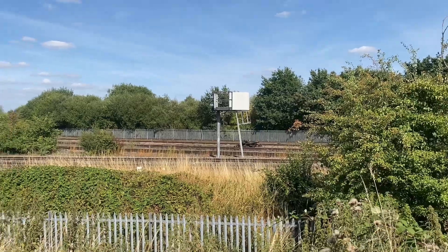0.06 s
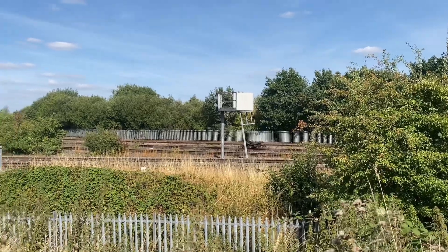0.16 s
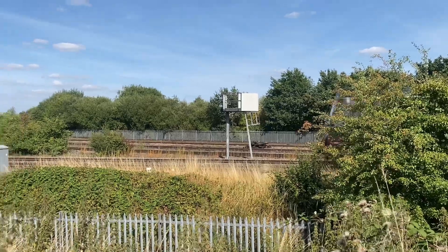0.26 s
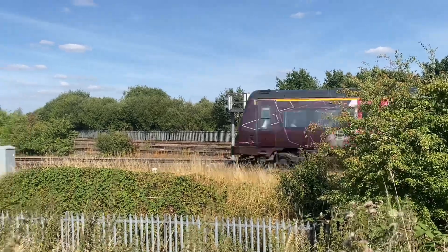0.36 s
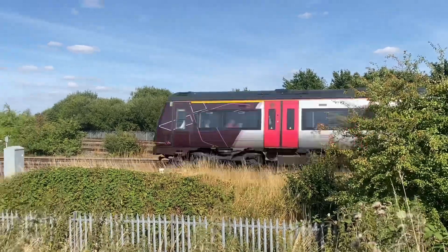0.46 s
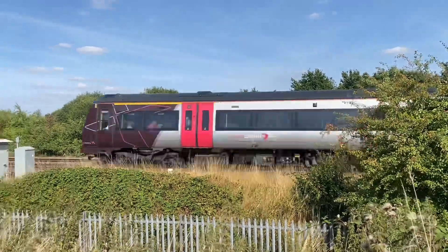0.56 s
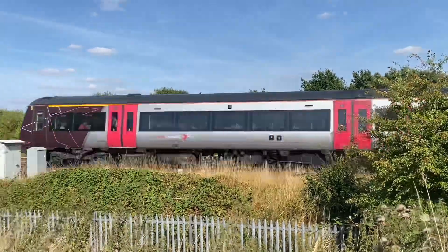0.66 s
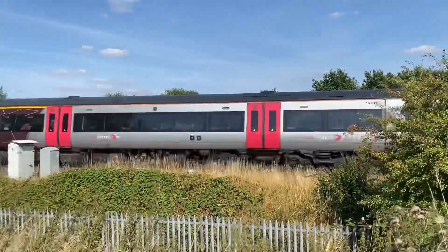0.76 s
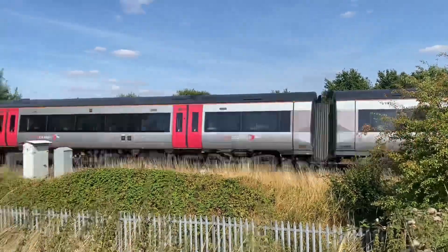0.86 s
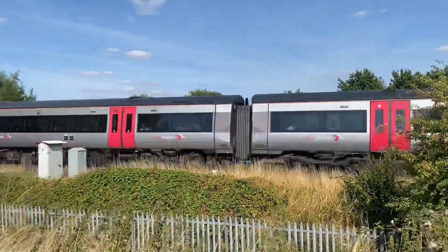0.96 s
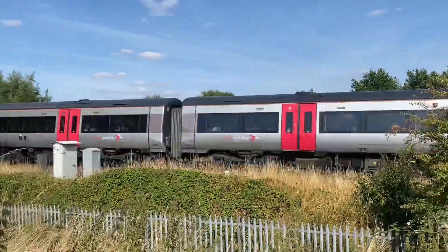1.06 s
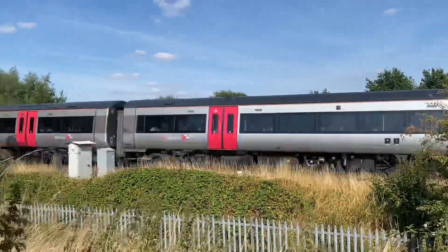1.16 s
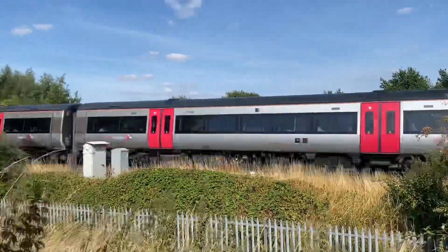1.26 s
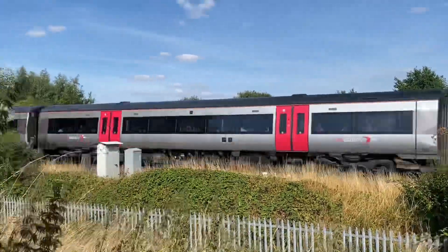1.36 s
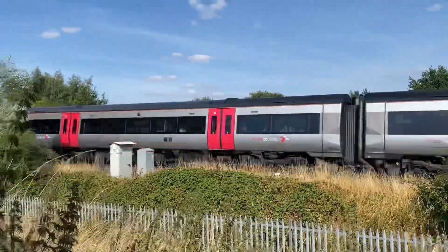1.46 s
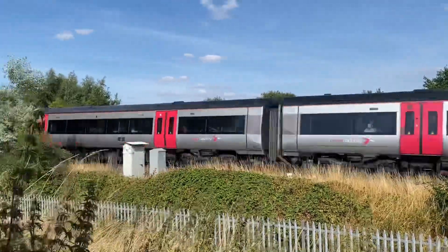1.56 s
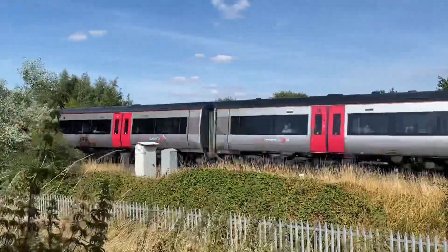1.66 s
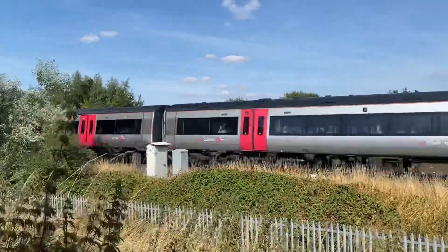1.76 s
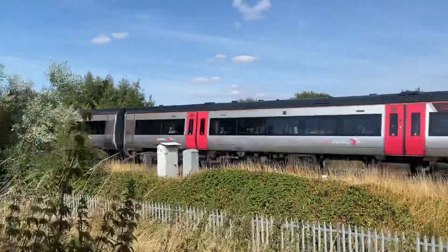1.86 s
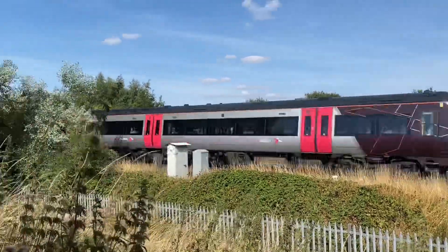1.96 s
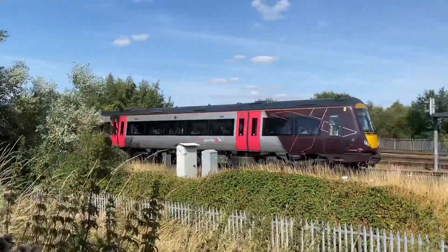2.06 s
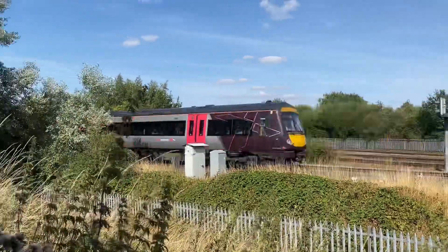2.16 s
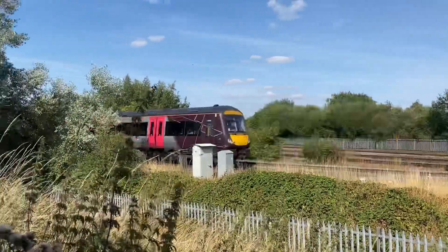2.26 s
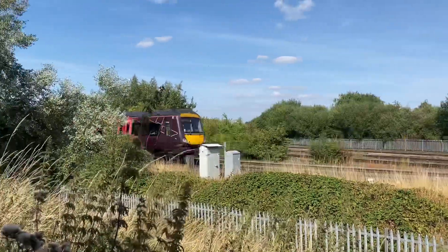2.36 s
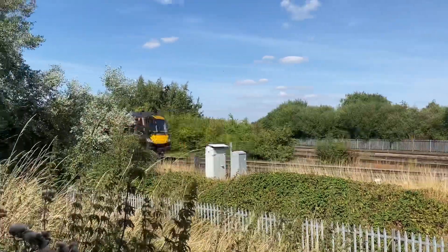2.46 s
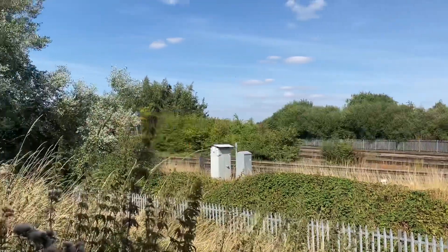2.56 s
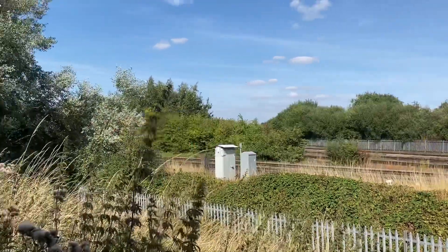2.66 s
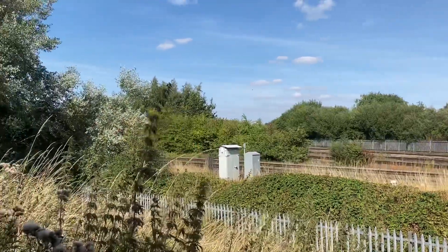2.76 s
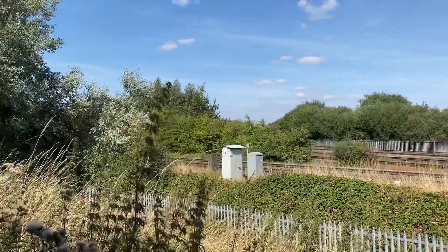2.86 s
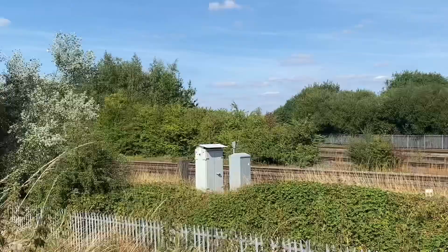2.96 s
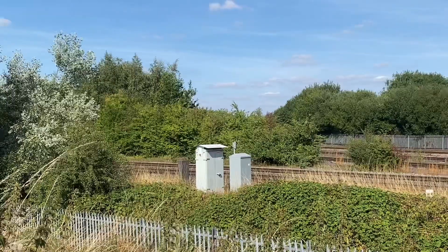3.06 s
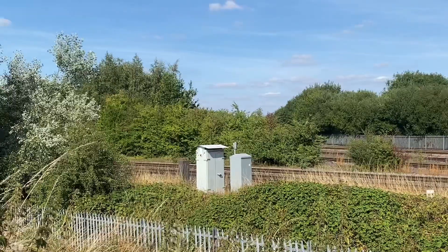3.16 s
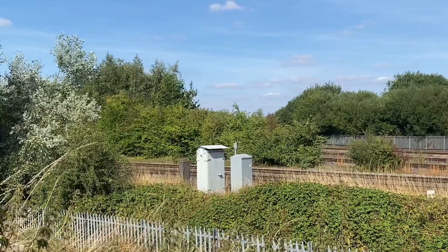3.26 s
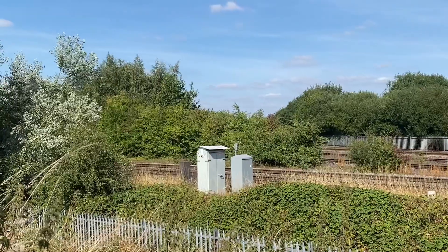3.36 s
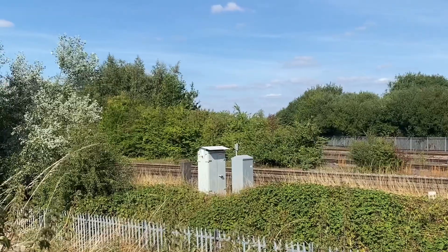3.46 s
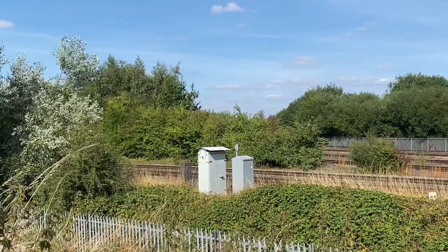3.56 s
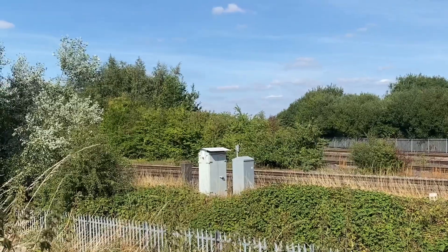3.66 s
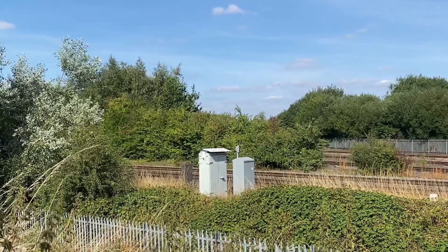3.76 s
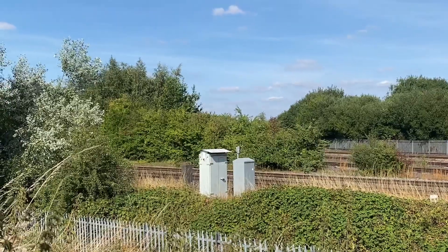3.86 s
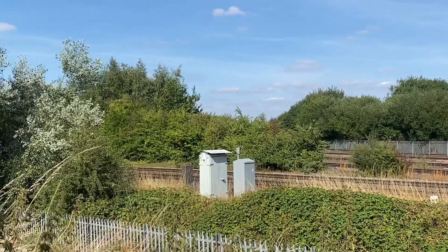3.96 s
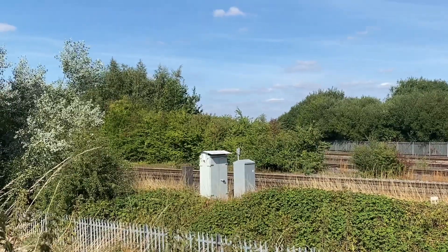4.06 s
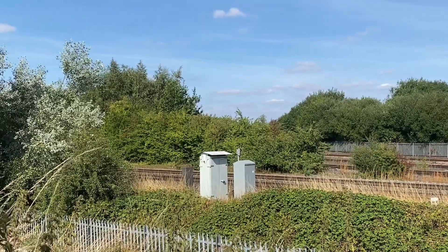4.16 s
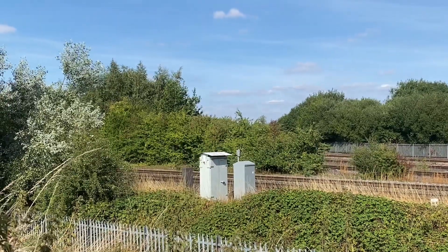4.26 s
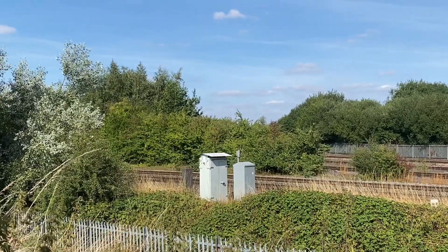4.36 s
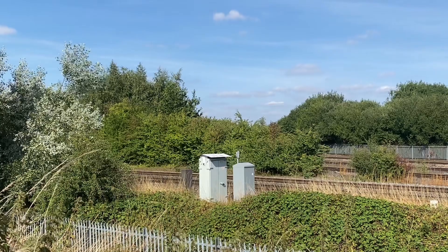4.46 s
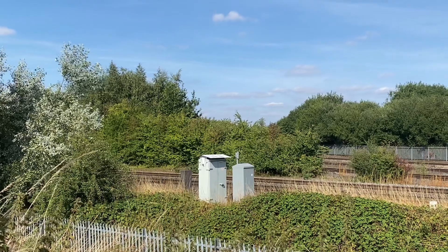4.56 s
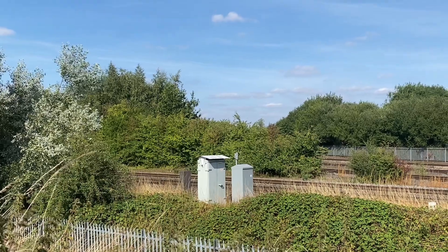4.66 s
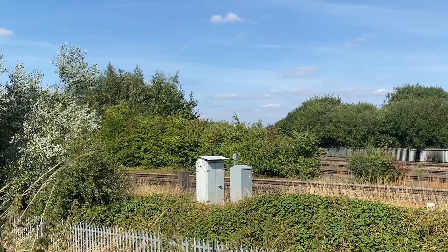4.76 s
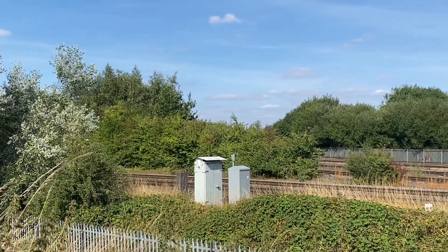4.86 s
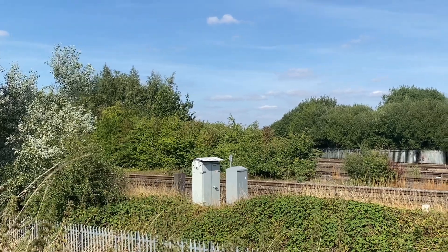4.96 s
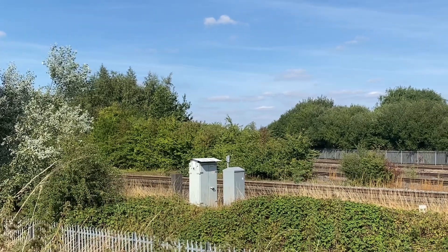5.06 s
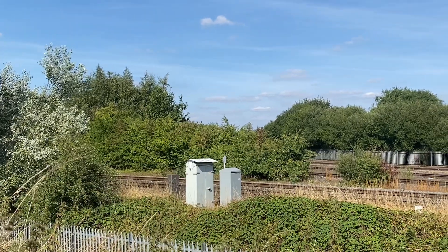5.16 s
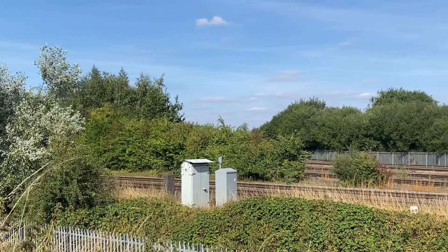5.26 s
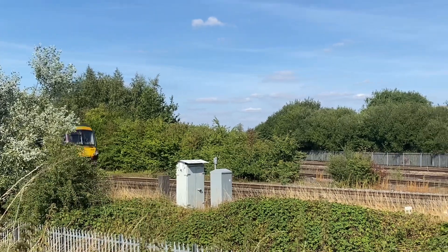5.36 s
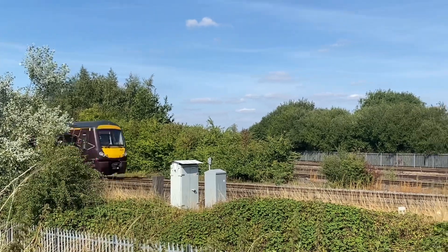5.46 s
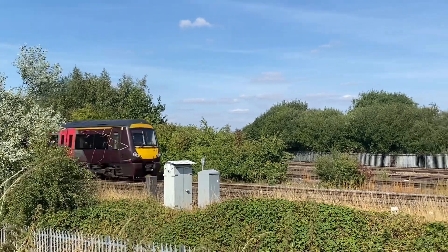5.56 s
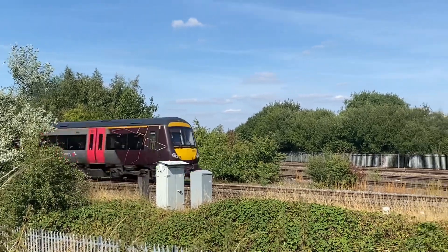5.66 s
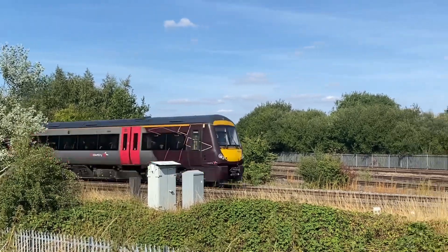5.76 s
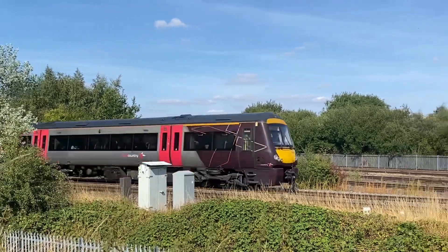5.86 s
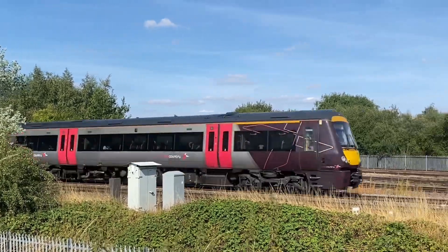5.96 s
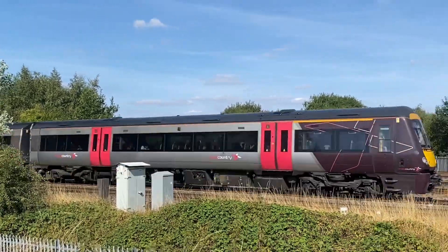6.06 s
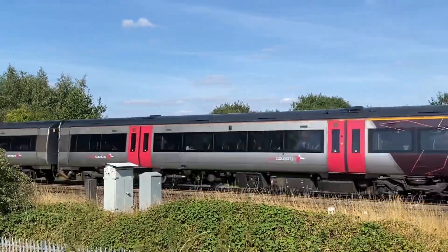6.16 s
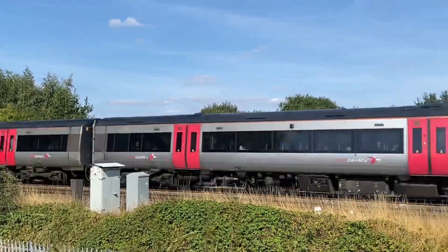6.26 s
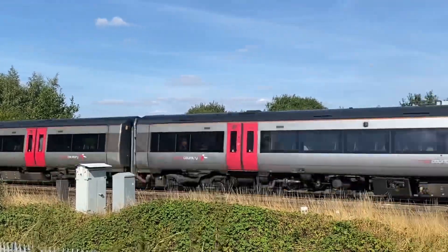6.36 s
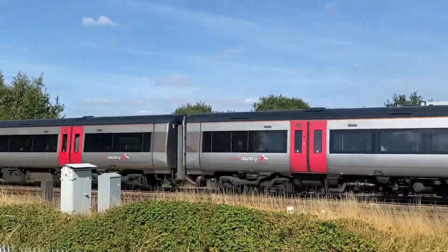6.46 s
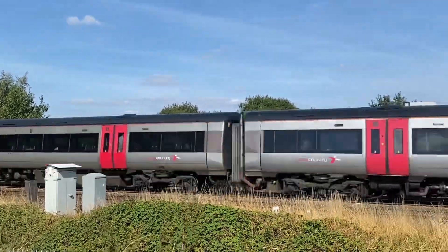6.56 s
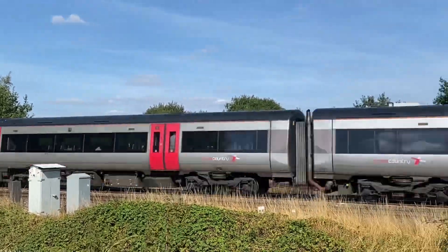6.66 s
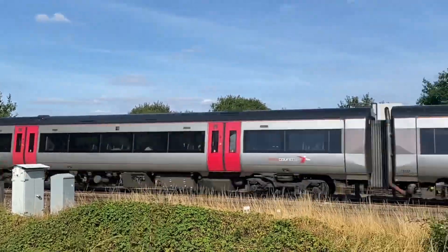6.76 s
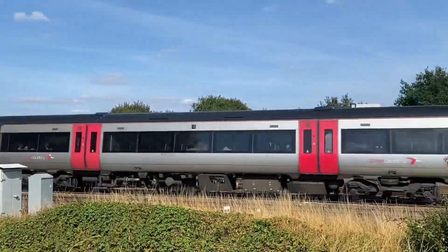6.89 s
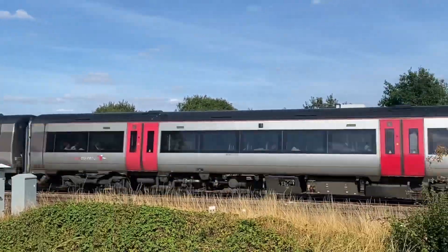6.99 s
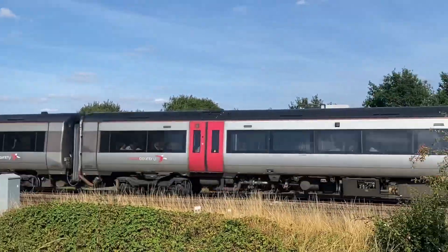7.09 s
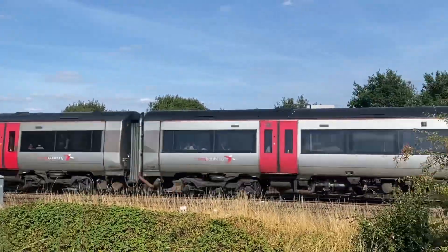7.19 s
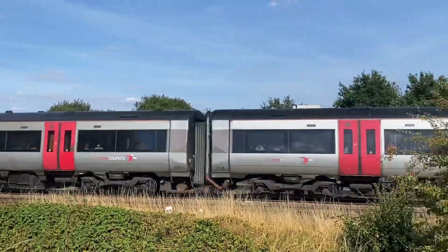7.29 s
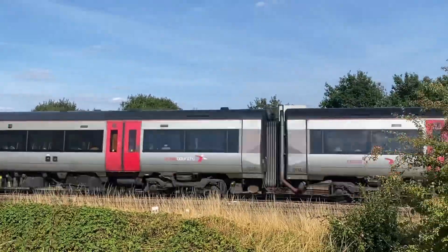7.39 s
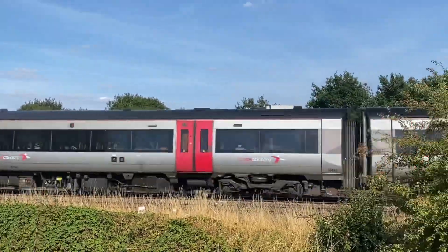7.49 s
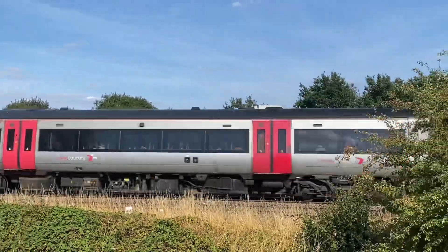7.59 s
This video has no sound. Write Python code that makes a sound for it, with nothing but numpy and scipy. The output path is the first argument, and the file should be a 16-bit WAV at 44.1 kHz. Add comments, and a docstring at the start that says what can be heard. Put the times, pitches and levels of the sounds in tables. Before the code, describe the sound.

Open air beside a railway, wide stereo, microphone about eighteen metres from the track. At 0 s a fast diesel train is already close; by 0.5 s its roar surges, with rumble, gritty steel rush, hissing air round the cab and a steady engine drone. A knock lands at 0.8 s; short whines and singing rails flicker through, pitches sliding down. It is loudest around 1-1.8 s, then the drone drops and the rush recedes until a sharp cut at 3 s. Then near quiet: faint air, low distant hum, and a flat wheel beating about fourteen times a second from 3.4 s. Throb and rail hiss build slowly to 5.5 s, then swell fast. From 6 s the second train rushes by with hard clanks in clusters, clean fan notes sinking in pitch, diesel throb and brief intake hisses. A heavy knock comes near 7.6 s, the train still passing at the end.

```python
"""Two three-car diesel trains pass at speed, heard in stereo 18 m from the line: the first rushes by and recedes,
then after a sudden cut the second comes from afar and passes. Wheels on rails roar as layers of coloured noise,
shaken once a turn by a flat spot; engines, fans and turbochargers are tones that fall in pitch as they go by.
Flat spots and other blows knock wheel and rail, rails sing as narrow noise of fixed pitch, and still air lies behind."""
import sys
import numpy as np
from scipy import signal
from scipy.fft import rfft, irfft, next_fast_len
from scipy.io import wavfile
from scipy.ndimage import uniform_filter1d, map_coordinates

SR = 44100
rng = np.random.default_rng(int(sys.argv[2]) if len(sys.argv) > 2 else 0)


def unload_wav(signal):
    """Save mono or channel-first audio to the path in sys.argv[1] as 16-bit WAV at rate SR, clipped to [-1, 1]."""
    wavfile.write(
        sys.argv[1],
        SR,
        np.round(np.clip(np.atleast_2d(signal).T, -1, 1) * 32767).astype(np.int16),
    )


N = 336483

CUT = 2.993  # s, from the first train to the second
TRACK_M = 18  # m, microphone to line
SPEED_A, SPEED_B = 41, 36  # m/s, first and second train
MIDDLE_A, MIDDLE_B = 1.183, 6.79  # s, when the middle car is abreast
CAR_M, BOGIE_M = 23.5, 8  # m, length of a car, and from its centre to each bogie


def amp(db):
    """Decibels to gain."""
    return 10 ** (np.asarray(db) / 20)


def unit(x):
    """Scale to rms 1."""
    return x / np.sqrt(np.mean(np.abs(x) ** 2) + 1e-20)


def clock():
    """The time of every sample in seconds."""
    return np.arange(N) / SR


def along(points, hz):
    """Read a curve of (frequency, value) points on a log frequency axis."""
    f, v = np.transpose(points)
    return np.interp(np.log(hz + 1), np.log(f + 1), v)


def colour(points, hz):
    """Gain of a spectrum that falls away steeply beyond its ends."""
    below = points[0][0] / (hz + 1)
    above = hz / points[-1][0]
    outside = np.maximum(np.maximum(below, above), 1)
    return amp(along(points, hz)) / outside ** 10


def curve(rows):
    """One level per sample from (time, level) points."""
    s, level = np.transpose(rows)
    return np.interp(clock(), s, level)


def wobble(rate):
    """A smooth random curve with rate knots a second."""
    knots = rng.standard_normal(int(N * rate / SR) + 4)
    coarse = np.arange(0, N + 32, 32)
    smooth = map_coordinates(knots, [coarse * rate / SR])
    return np.interp(np.arange(N), coarse, smooth)


def filtered(x, response):
    """Filter x by a complex response of frequency."""
    m = next_fast_len(N + 8192)
    return irfft(rfft(x, m) * response(np.fft.rfftfreq(m, 1 / SR)), m)[..., :N]


def window(start, end, fade):
    """Gain that comes in, holds and goes; it is half open at start and end."""
    inside = np.minimum(clock() - start, end - clock())
    return np.clip(inside / fade + .5, 0, 1)


def beam(loudest, span):
    """Gain of an opening that faces the microphone for a moment: 12 dB down one span from its loudest."""
    return 1 / (1 + ((clock() - loudest) / span) ** 2) ** 2


def rush(spectrum, alike):
    """Stereo noise whose middle has rms 1; less left-right likeness turns more of it into side signal."""
    def response(hz):
        turn = np.arccos(np.clip(along(alike, hz), 0, 1)) / 2
        return colour(spectrum, hz) * np.array([np.cos(turn), np.sin(turn)])
    mid, side = filtered(rng.standard_normal((2, N)), response)
    return np.array([mid + side, mid - side]) / np.std(mid)


def pass_by(abreast, speed):
    """Nearness (1 when abreast) and the Doppler-warped time of a source on the train."""
    ahead = speed * (abreast - clock())
    distance = np.hypot(ahead, TRACK_M)
    doppler = 1 + speed / 343 * ahead / distance  # sound travels at 343 m/s
    return TRACK_M / distance, np.cumsum(doppler) / SR


def swell(middle, speed, db, fall, behind_m):
    """Level in dB of a sound spread over all bogies; fall 1 is plain spreading, more adds ground and air loss."""
    cars = CAR_M * np.array([-1, 0, 1])
    bogies = np.add.outer(cars, BOGIE_M * np.array([-1, 1])).ravel()

    def power(ahead):
        return sum(1 / (TRACK_M ** 2 + (ahead + place) ** 2) for place in bogies)
    t = np.linspace(0, N / SR, 200)
    ahead = speed * (middle - t) + behind_m
    return np.interp(clock(), t, db + fall * 10 * np.log10(power(ahead) / power(0)))


def tone(hz, width_hz, time):
    """A complex tone whose pitch wanders by about its width."""
    drift = np.cumsum(width_hz / 2 * wobble(2 * width_hz + 2)) / SR
    return np.exp(2j * np.pi * (hz * time + drift + rng.random()))


# still air beside the line: (frequency [Hz], level [dB per Hz], relative)
AIR = [(100, 18.5), (2000, -4), (4500, -33), (7000, -15.5), (8500, -24), (11000, -16), (15500, -18)]
# left-right likeness of the still air, the knocks and the second train: (frequency [Hz], likeness [0-1])
ALIKE_B = [(80, .993), (350, .92), (750, .75), (1300, .66), (2000, .93), (2600, .995), (3300, 1)]


def still_air():
    """The quiet of the place: steady coloured noise."""
    return amp(-52.0) * rush(AIR, ALIKE_B)


def wheel_flat(turn_hz, first, decay):
    """A flat spot kicks once every wheel turn and dies away; the kicks vary in strength and average to 0."""
    age = ((clock() - first) * turn_hz) % 1 / turn_hz
    rounded = uniform_filter1d(np.exp(-age / decay), size=90)
    kick = rounded * amp(3.2 * wobble(10))
    return kick - kick.mean()


def metallic(x, depth_db):
    """Steel modes come and go in the noise: narrow, short-lived streaks in the treble."""
    hz, _, z = signal.stft(x, SR, nperseg=1024)
    field = rng.standard_normal(z.shape[1:])
    field = uniform_filter1d(field, size=2, axis=0)  # narrow in pitch
    field = uniform_filter1d(field, size=12, axis=1)  # longer in time
    treble = np.clip(hz / 760 - 1, 0, 1)[:, None]  # streaks start at 760 Hz, full an octave up
    gain = amp(depth_db * unit(field) * treble)
    return signal.istft(z * gain, SR, nperseg=1024)[1][:, :N]


def rolling(middle, speed, layers, spectra, alike, flat, flutter_db, shades_db):
    """Layers of wheel and rail noise; the flat spot and rail roughness shake the rail most and the rumble least."""
    shake = np.maximum(1 + flat, .1) * amp(flutter_db * wobble(35))
    shares = [.16, .45, 1, .4, .2, .35]  # of the shaking, per layer
    roar = 0
    for layer, spectrum, share, shade_db in zip(layers, spectra, shares, shades_db):
        level_db = swell(middle, speed, *layer) + shade_db + 0.56 * wobble(9)
        roar = roar + amp(level_db) * shake ** share * rush(spectrum, alike)
    # far off, the modes of many wheels blend into a smooth rush
    near = np.sqrt(pass_by(middle, speed)[0])
    return near * metallic(roar, depth_db=3.1) + (1 - near) * roar


def exhausts(engines, speed, orders, level_db, unsteady_hz, waver_db):
    """The cars' engines beat against each other; the nearest one tends to lead, the sum is held to one level."""
    cars = [(hz, db, *pass_by(abreast, speed)) for abreast, hz, db in engines]
    out = np.zeros(N)
    for multiple, order_db in orders:
        chord = sum(amp(db) * near ** 2 * tone(multiple * hz, unsteady_hz, time) for hz, db, near, time in cars)
        power = np.abs(uniform_filter1d(np.abs(chord) ** 2, size=SR // 5))  # over 0.2 s
        steady = chord.real * np.sqrt(2 / (power + 1e-12))
        out += amp(order_db + waver_db * wobble(11)) * steady
    return amp(level_db) * out


def from_right(x, lead_ms):
    """A sound that reaches the right ear a little before the left."""
    half = lead_ms / 2000  # s
    return filtered(x, lambda hz: np.exp(2j * np.pi * np.outer([-half, half], hz)))


def rail_song(rows):
    """Wheels far and near excite the rails' resonances: narrow noise that keeps its pitch."""
    t, out = clock(), np.zeros(N)
    for hz, width_hz, db, start, end in rows:
        ring = (wobble(width_hz) + 1j * wobble(width_hz)) * np.exp(2j * np.pi * hz * t)
        out += amp(db) * window(start, end, fade=.2) * unit(ring.real)
    return out


def whines(rows, speed):
    """Hums, ringing wheels and turbochargers: fluttering tones, each heard for a while, that slide down in passing."""
    out = np.zeros(N)
    for abreast, hz, width_hz, db, start, end in rows:
        note = np.sqrt(2) * tone(hz, width_hz, pass_by(abreast, speed)[1]).real
        out += amp(db + 1.8 * wobble(25)) * window(start, end, fade=.05) * note
    return out


def gusts(rows, spectrum, alike):
    """One part of the train stands out of the roar as it goes by: noise under a brief swell."""
    gain = sum(amp(db) * beam(s, span) for s, db, span in rows)
    return gain * rush(spectrum, alike)


# air round the leading cab: (time abreast [s], level before eddies and shading [dB], span [s])
NOSE = [(.68, -35.5, 0.93)]
# its colour: (frequency [Hz], level [dB per Hz], relative)
NOSE_RUSH = [(1300, 7), (2100, -1), (3000, 5), (4500, -6), (6400, -7), (8000, -22)]


def nose_rush(shade_db):
    """Air rushing round the leading cab, roughened by quick eddies and shaded by the bush."""
    eddies = amp(2.5 * wobble(70))
    return gusts(NOSE, NOSE_RUSH, ALIKE_A) * eddies * amp(shade_db)


# wheel blows, many of them a flat spot striking the rail once a turn; levels before the attack softens them:
# (time [s], frame pitch [Hz], thud level [dB], clank level [dB], crack level [dB])
KNOCKS = [(.842, 400, -20, -18, -26), (2.983, 600, -29, -23, -36), (3.375, 450, -45, -35.5, -56),
          (3.447, 450, -46, -35.5, -54), (3.802, 450, -46, -35.5, -56), (6.042, 420, -21, -13.5, -22.5),
          (6.113, 510, -24, -17.5, -28), (6.185, 470, -21, -17.5, -25), (6.255, 420, -24, -21, -21),
          (6.512, 520, -13, -16.5, -21.5), (6.578, 370, -13.5, -13, -22.5), (6.944, 490, -8, -11.5, -26),
          (7.015, 460, -21, -13, -30), (7.148, 410, -15, -18, -22), (7.232, 540, -21, -14, -32),
          (7.588, 474, -11, -16, -29)]
# colours of the frame's thud, the wheel's clank and its bright crack: (frequency [Hz], level [dB per Hz], relative)
BOGIE = [(150, -6), (300, 0), (520, -2), (700, -8)]
CLANK = [(600, -11), (930, 8), (1400, -9.5)]
CRACK = [(1400, -4), (2000, 0.5), (3000, -5), (4500, -15), (8000, -26)]


def knocks(start, end):
    """Each blow rings the bogie frame briefly at one pitch, thuds, clanks in the wheel and cracks at the contact."""
    rings, thuds, clanks, cracks = np.zeros((4, N + SR))
    age = np.arange(SR // 4) / SR
    attack_s, t60 = .0022, .085  # s, rise, and time to fall 60 dB

    def blow(db):
        return amp(db - 60 * age / t60) * (1 - np.exp(-age / attack_s))
    for s, frame_hz, thud_db, clank_db, crack_db in KNOCKS:
        if not start < s < end:
            continue
        at = slice(round(s * SR), round(s * SR) + len(age))
        rings[at] += blow(thud_db) * np.sqrt(2) * np.sin(2 * np.pi * frame_hz * age)
        thuds[at] += blow(thud_db) * .7  # the noise of the thud lies under its ring
        clanks[at] += blow(clank_db)
        cracks[at] += blow(crack_db)
    noisy = [(thuds, BOGIE), (clanks, CLANK), (cracks, CRACK)]
    return rings[:N] + sum(part[:N] * rush(spectrum, ALIKE_B) for part, spectrum in noisy)


# first train's rolling layers (underframe rumble, sleeper roar, rail, wheel ring, air hiss, fine spray), unshaded:
# (level when abreast [dB], steepness of fall with distance [1 = plain], centre behind the train's middle [m])
ROLL_A = [(-20, 1.2, -22), (-20.5, 1.3, -12.5), (-24.5, 0.92, -1.5), (-27, 1.87, 0.5), (-34.5, 2.2, 1.5),
          (-43.5, 1.9, 1)]
# their colours in the same order: (frequency [Hz], level [dB per Hz], relative)
RUMBLE_A = [(18, -40), (30, -18), (42, -14.5), (56, -1.5), (75, -4.5), (110, -8.5), (140, -11.5),
            (205, -15), (260, -48)]
SLEEPERS_A = [(120, -33), (205, -15), (216, -0.5), (360, -1), (450, -4), (555, -1.5), (690, -13),
              (900, -60), (1520, -120)]
RAIL_A = [(410, -25), (690, -6), (936, 2), (1120, -2), (1220, -2), (1350, -15.5), (1450, -12.5),
          (1880, -9.5), (3190, -120)]
WHEEL_A = [(850, -25), (1450, -8), (1720, 0.5), (2080, 0.5), (2290, -1.5), (2480, -6.5), (2840, -6),
           (3300, -14.5), (4290, -44), (7260, -120)]
HISS_A = [(2900, -11), (3300, 1.5), (4500, 0.5), (6200, -2), (7500, -10)]
SPRAY_A = [(7500, -2), (8500, -2), (10000, 2.5), (12000, -5), (15500, -10.5)]
# left-right likeness: (frequency [Hz], likeness [0-1])
ALIKE_A = [(70, 0.98), (300, 0.93), (700, 0.36), (1100, 0.45), (2000, 0.3), (5000, 0.12), (7000, 0.34),
           (8500, 1)]
# a near bush shades the treble: (time [s], level at full share [dB]), and each layer's share [0-1]
SHADE_A = [(.28, -3.5), (.44, 0), (.9, 0.5), (1.5, -.5), (2.05, 1), (2.35, -0.5), (2.9, 0)]
SHADE_SHARES_A = [0, .3, .7, 1, 1, 1]
# diesel engines: (time abreast [s], firing rate [Hz], level against each other [dB])
ENGINES_A = [(.9, 86.2, 5.5), (1.45, 86.43, 6)]
# exhaust partials: (multiple of the firing rate, level within the drone [dB])
ORDERS_A = [(2, -0.96), (3, -14), (4, -14), (6, -13)]
# the drone rises, holds while the cars go by, and drops behind the last: (time [s], level [dB])
DRONE_A = [(0, -28.5), (.49, -20.5), (1.8, -19), (2.14, -27), (2.34, -39)]
# air intakes hissing past: (time abreast [s], level [dB], span [s])
INTAKES_A = [(.78, -46, 0.37), (1.78, -39, 0.31)]
# hums, ringing wheels, turbochargers:
# (time abreast [s], frequency [Hz], width [Hz], level [dB], from [s], until [s])
WHINES_A = [(0.606, 73, 1, -21, 0.45, 0.8), (.6, 73, 1, -30, 2.3, 2.6), (0.7, 510, 4, -26.5, 0.63, 0.8),
            (1.27, 505, 4, -27, 1.15, 1.35), (.9, 1605, 4, -37.5, -.1, .22),
            (.5, 1712, 30, -29.5, .44, .53), (.55, 1660, 25, -29.5, .54, .63),
            (1.7, 1525, 20, -27.5, .89, .96), (1.7, 1540, 25, -27.5, 1.01, 1.19),
            (2, 1590, 22, -31.5, 1.65, 1.76), (.8, 2810, 30, -37.5, .74, .88)]
# singing rails: (frequency [Hz], width [knots/s], level [dB], from [s], until [s])
RAILS_A = [(1120, 27, -32, 0.91, 1.4), (2254, 16, -36.5, 0.85, 2.03), (2380, 15.6, -43, -2, 1.1),
           (873, 240, -38.5, 1.7, 2.7), (1934, 240, -35.5, 2.06, 2.33)]


def first_train():
    """Out from behind a bush, close and under power, then receding: roar, nose rush, drone and passing details."""
    flat = 0.17 * wheel_flat(turn_hz=18.0, first=0.27, decay=0.0049)
    spectra = [RUMBLE_A, SLEEPERS_A, RAIL_A, WHEEL_A, HISS_A, SPRAY_A]
    shades_db = np.outer(SHADE_SHARES_A, curve(SHADE_A))
    wheels = rolling(MIDDLE_A, SPEED_A, ROLL_A, spectra, ALIKE_A, flat, flutter_db=1.45, shades_db=shades_db)
    nose = nose_rush(shades_db[-1])
    drone = exhausts(ENGINES_A, SPEED_A, ORDERS_A, curve(DRONE_A), unsteady_hz=0.844, waver_db=0.5)
    intakes = gusts(INTAKES_A, SPRAY_A, ALIKE_A)
    details = intakes + whines(WHINES_A, SPEED_A) + rail_song(RAILS_A)
    return wheels + nose + from_right(drone, lead_ms=0.42) + details


def far_drone(hz, db, end):
    """A low hum of fixed pitch from far off, lost over the last second as the second train draws near."""
    present = np.clip(end - clock(), 0, 1)
    return amp(db + wobble(3.12)) * present * np.sqrt(2) * tone(hz, 0.69, clock()).real


# levels of the second train's two cooling fans, before flutter: (time [s], level [dB])
FRONT_FAN = [(5.1, -70), (5.39, -35), (5.69, -39), (5.91, -29.5), (6.12, -30), (6.18, -23), (6.29, -23.5),
             (6.38, -34), (6.5, -70)]
MIDDLE_FAN = [(6.38, -70), (6.49, -29), (6.66, -27), (6.73, -32), (6.79, -19), (6.86, -18), (6.93, -23),
              (7.05, -24.5), (7.18, -36), (7.28, -28), (7.49, -29), (7.62, -70)]
# the fans: (time abreast [s], frequency [Hz], level curve)
FANS = [(6.55, 337, FRONT_FAN), (7.35, 383, MIDDLE_FAN)]


def fans(speed):
    """Each cooling fan holds one clean note, which swells as its grille faces the microphone and sinks in passing."""
    out = np.zeros(N)
    for abreast, hz, level in FANS:
        note = np.sqrt(2) * tone(hz, 1, pass_by(abreast, speed)[1]).real
        out += amp(curve(level) + wobble(25)) * note
    return out


# second train's rolling layers (underframe rumble, sleeper roar, rail, wheel ring, air hiss, fine spray), unshaded:
# (level when abreast [dB], steepness of fall with distance [1 = plain], centre behind the train's middle [m])
ROLL_B = [(-25, 1.12, -12), (-22.5, 1.57, 6.5), (-22.5, 1.75, 9), (-26, 2.2, 1), (-33, 3.05, 1.5),
          (-46, 2.6, 10)]
# their colours in the same order: (frequency [Hz], level [dB per Hz], relative)
RUMBLE_B = [(18, -40), (30, -20), (42, -5.5), (56, -1), (70, 1.5), (100, -4), (130, -11), (205, -14),
            (260, -31)]
SLEEPERS_B = [(120, -46), (205, -6.5), (232, -2), (409, 0), (599, -7), (690, -19), (900, -43), (1520, -120)]
RAIL_B = [(410, -50), (690, -5), (808, -2), (971, 0.5), (1450, -12), (1880, -73), (3190, -120)]
WHEEL_B = [(850, -36), (1450, -23), (1540, -7), (1820, -3.5), (1910, -2), (2320, -7), (3300, -16.5),
           (4290, -25), (7260, -120)]
HISS_B = [(2900, -1.5), (3300, 0.5), (4200, 1.5), (5400, -2.5), (7500, -11.5)]
SPRAY_B = [(7500, -9), (8400, -8), (9500, 1), (10700, -1), (12000, -6.5), (15500, -13)]
# far bushes shade the rumble: (time [s], level at full share [dB]), and each layer's share [0-1]
SHADE_B = [(3.7, -5.5), (3.95, 0.5)]
SHADE_SHARES_B = [1, .15, 0, 0, 0, 0]
# a rough wheelset roaring past: (time abreast [s], level [dB], span [s])
ROUGH_WHEELS = [(7.23, -22.5, 0.12)]
# diesel engines: (time abreast [s], firing rate [Hz], level against each other [dB])
ENGINES_B = [(6.7, 73.2, -8), (7.6, 73.4, 3), (8.25, 73.6, -4)]
# exhaust, firing tone then upper partials, before screening and partial levels:
# (level when abreast [dB], steepness of fall with distance [1 = plain], centre behind the train's middle [m])
EXHAUST_B = [(-17, 1.39, 2.3), (-21.5, 1.52, 10.3)]
# partials of the throb and of the buzz: (multiple of the firing rate, level within the sound [dB])
THROB_B = [(5 / 6, -12.5), (1, -1.6), (7 / 6, -16.5)]
ORDERS_B = [(3, -7.5), (4, -8)]
# the throb comes and goes behind trees: (time [s], level [dB])
SCREEN_B = [(3.7, -14), (4.0, 1), (5.0, -1), (5.52, -14), (5.8, 1.5), (6.5, 0.5)]
# the hum, an octave over the firing tone: (time [s], level [dB])
HUM_B = [(3.0, -49.5), (3.7, -46.5), (4.4, -40), (5.2, -35), (5.55, -48), (5.8, -29), (6.1, -24.5),
         (6.27, -29), (6.45, -25.5), (6.8, -28.5), (7.1, -24), (7.6, -21)]
# air intakes hissing past: (time abreast [s], level [dB], span [s])
INTAKES_B = [(6.02, -47, 0.2), (6.58, -34.5, 0.38), (7.28, -37, 0.2)]
# ringing wheel and turbochargers:
# (time abreast [s], frequency [Hz], width [Hz], level [dB], from [s], until [s])
WHINES_B = [(6.7, 1815, 35, -28.5, 6.57, 6.7), (6.6, 10560, 130, -51, 5.87, 6.28),
            (6.6, 10560, 130, -45, 6.28, 6.8), (7.3, 10130, 150, -46.5, 6.84, 7.44)]
# singing rails, before the flat spot shakes them:
# (frequency [Hz], width [knots/s], level [dB], from [s], until [s])
RAILS_B = [(1110, 80, -46, 3.8, 4.9), (1040, 150, -41, 4.7, 6.1)]


def second_train():
    """Throbbing from afar with a beating wheel, then rushing past: roar, exhausts, fans and passing details."""
    # the flat wheel beats steadily from afar; close by, its single blows are listed in KNOCKS
    depth = np.interp(clock(), [3.5, 5.8, 6.05], [.75, .65, .15])
    flat = depth * wheel_flat(turn_hz=14.2, first=3.376, decay=.012)
    spectra = [RUMBLE_B, SLEEPERS_B, RAIL_B, WHEEL_B, HISS_B, SPRAY_B]
    shades_db = np.outer(SHADE_SHARES_B, curve(SHADE_B))
    wheels = rolling(MIDDLE_B, SPEED_B, ROLL_B, spectra, ALIKE_B, flat, flutter_db=0.36, shades_db=shades_db)
    wheels = wheels + gusts(ROUGH_WHEELS, RAIL_B, ALIKE_B)
    firing_db, upper_db = [swell(MIDDLE_B, SPEED_B, *row) for row in EXHAUST_B]
    throb_db = firing_db + curve(SCREEN_B)
    throb = exhausts(ENGINES_B, SPEED_B, THROB_B, throb_db, unsteady_hz=0.532, waver_db=1.5)
    hum = exhausts(ENGINES_B, SPEED_B, [(2, 0)], curve(HUM_B), unsteady_hz=0.58, waver_db=0.5)
    # the top partial is the last car's alone
    buzz = sum(exhausts(cars, SPEED_B, [order], upper_db, unsteady_hz=.7, waver_db=2)
               for cars, order in zip([ENGINES_B, ENGINES_B[-1:]], ORDERS_B))
    intakes = gusts(INTAKES_B, SPRAY_B, ALIKE_B)
    rails = (1 + flat / 2) * rail_song(RAILS_B)
    details = intakes + whines(WHINES_B, SPEED_B) + rails
    return wheels + throb + hum + buzz + fans(SPEED_B) + details + far_drone(hz=96.0, db=-40.0, end=5.8)


def scene():
    """One train up to the cut, a blink of quiet, then the other, over still air."""
    before = np.clip((CUT - clock()) / 0.0015, 0, 1)
    after = np.clip((clock() - CUT - .006) / 0.0067, 0, 1)
    first = first_train() + knocks(0, CUT)
    second = second_train() + knocks(CUT, N / SR)
    return before * first + after * second + still_air()


# left microphone port over right: (frequency [Hz], level [dB])
PORT_BALANCE = [(60, -1.7), (180, -2.8), (350, -2.4), (700, -.3), (1000, -1.5), (1500, 1), (2200, 0)]


def record(dry):
    """Peaks are rounded off; the two microphone ports differ in level, and in phase in the high treble."""
    turn_hz, period_hz, top_hz = 7100, 4050, 15850  # Hz, phase lag starts, lag grows one turn, band limit
    ceiling = .85  # full scale is 1

    def ports(hz):
        lag = 2 * np.pi * np.maximum(hz - turn_hz, 0) / period_hz
        half = amp(along(PORT_BALANCE, hz) / 2) * np.exp(-1j * lag / 2)
        return np.array([half, 1 / half]) * (hz < top_hz)
    held = dry / (1 + np.abs(dry / ceiling) ** 8) ** (1 / 8)
    return filtered(held, ports)


dry = scene()
out = record(dry)
unload_wav(out)
```